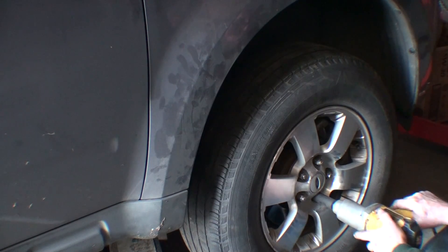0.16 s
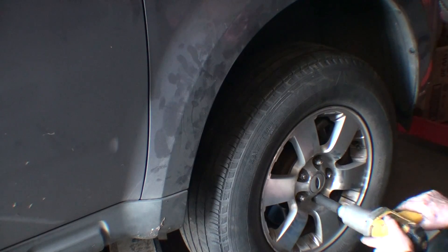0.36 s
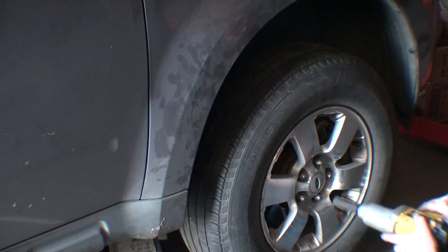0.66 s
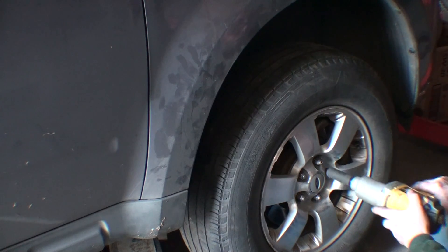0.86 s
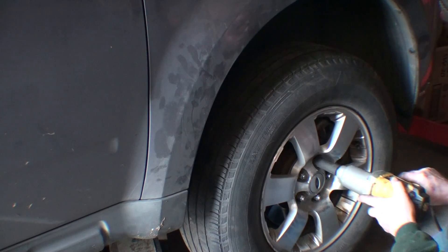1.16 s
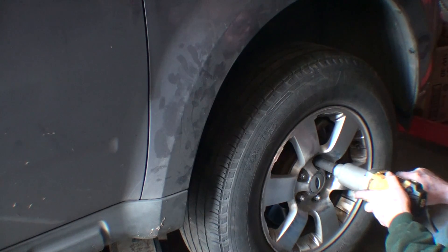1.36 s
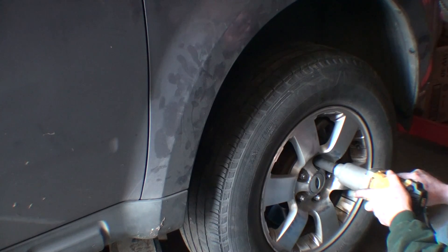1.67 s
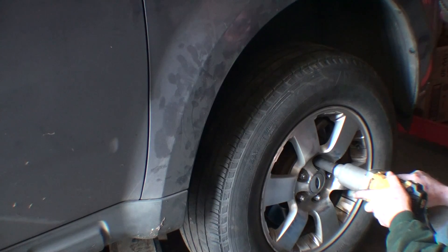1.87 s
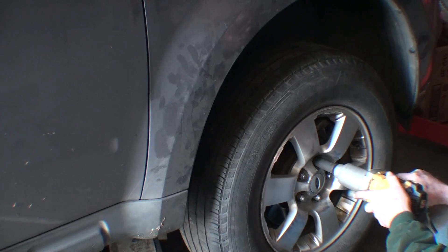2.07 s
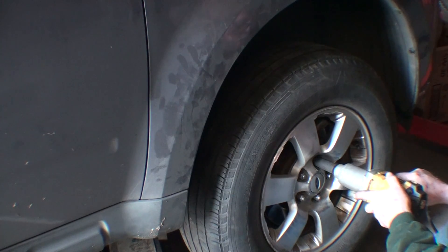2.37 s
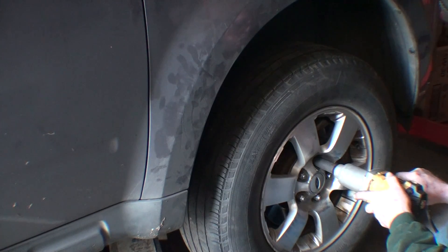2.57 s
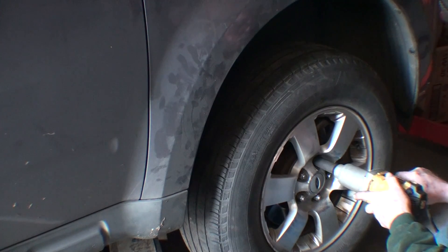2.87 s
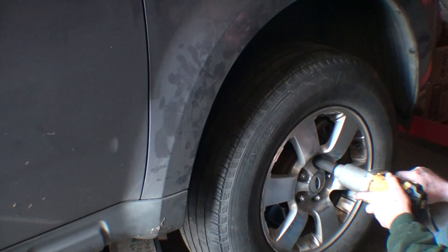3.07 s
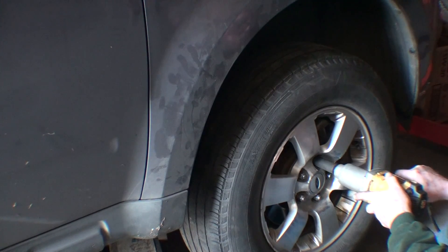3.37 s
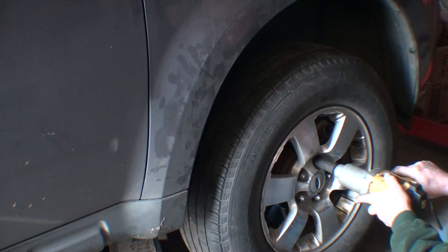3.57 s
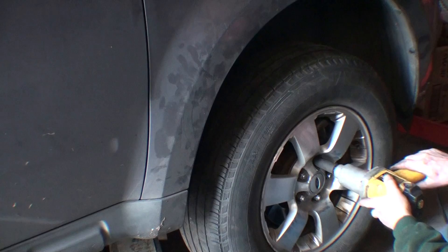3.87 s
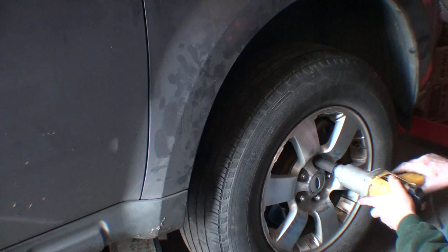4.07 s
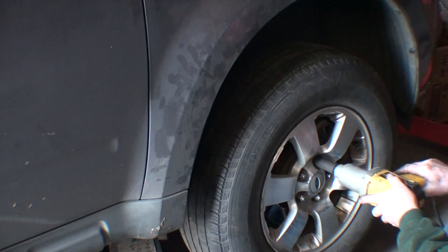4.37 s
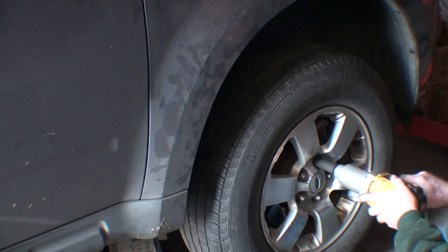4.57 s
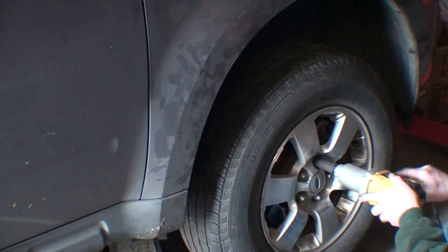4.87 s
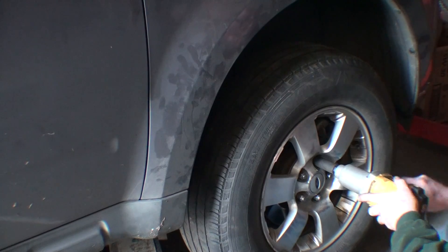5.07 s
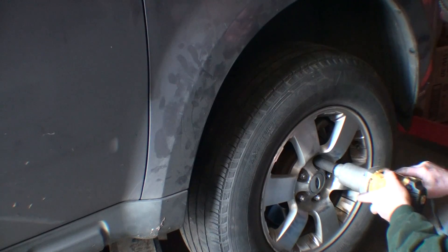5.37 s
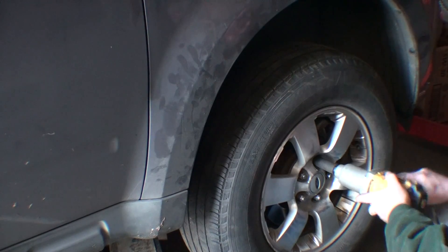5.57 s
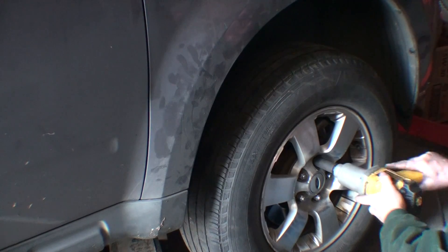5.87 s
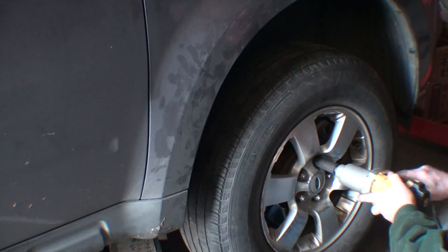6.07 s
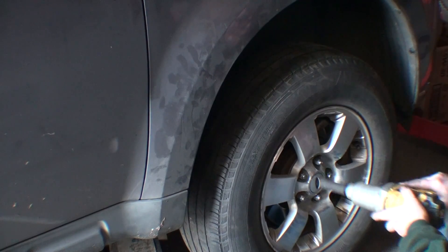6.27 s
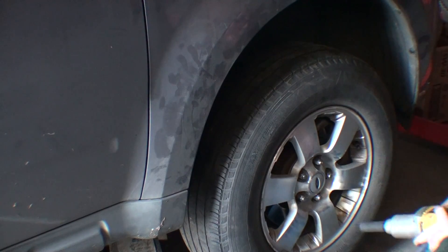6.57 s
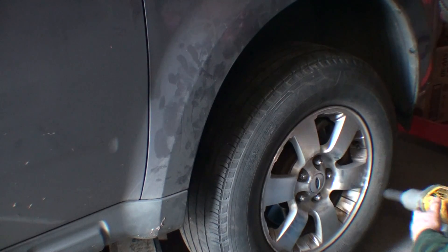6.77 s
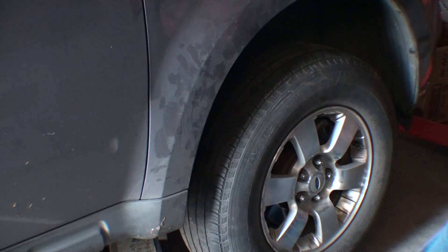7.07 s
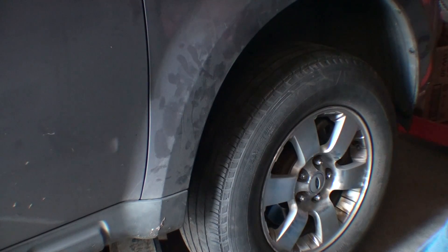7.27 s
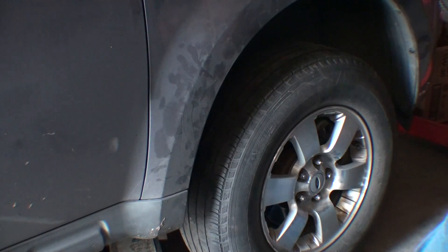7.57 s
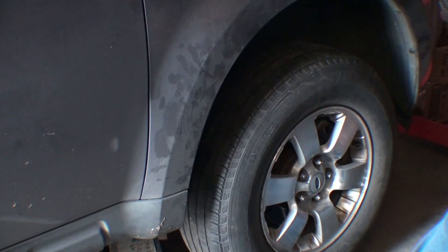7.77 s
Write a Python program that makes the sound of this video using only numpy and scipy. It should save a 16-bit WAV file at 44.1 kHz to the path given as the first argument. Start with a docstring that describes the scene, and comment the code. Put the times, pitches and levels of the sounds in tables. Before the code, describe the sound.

In a garage, an electric impact wrench rattles down to a stop, leaving a faint ringing rim and a few socket clicks. It then hammers a wheel nut loudly for about two seconds, around 37 blows a second, and coasts out irregularly. Soft knocks and scuffs follow as the socket fumbles; finally the tool lands on concrete with sharp clanks. Close microphone, short room reverberation.

```python
"""An electric impact wrench works on a wheel nut in a garage: filtered noise for rattle, bursts for blows.
It first coasts to a stop; the alloy rim rings on as beating sines, and the tool is moved to the next nut
with a few knocks of clicks and modes. It then hammers for two seconds, wheel and car body answering with
modes at the blow rate, and coasts again. The rim rings anew while the socket is fumbled on the nut;
at last the tool is put down on concrete with thuds and clanks. Reverberation and quiet air run throughout."""
import sys
import numpy as np
from scipy import signal
from scipy.fft import rfft, irfft, next_fast_len
from scipy.io import wavfile
from scipy.ndimage import uniform_filter1d

SR = 44100
rng = np.random.default_rng(int(sys.argv[2]) if len(sys.argv) > 2 else 0)


def wav_record(signal):
    """Record a signal, one row per channel, as 16-bit PCM in the file named by sys.argv[1]."""
    frames = np.transpose(np.atleast_2d(signal))
    bounded = np.clip(frames, -1, 1)
    # unit amplitude maps onto the largest positive 16-bit level
    quanta = np.round(bounded * 32767).astype(np.int16)
    wavfile.write(sys.argv[1], SR, quanta)


N = 349699
TIME = np.arange(N) / SR  # [s]

# Spectra and mode levels are relative: each sound is normalised before its own level is applied.

# Quiet air of the garage: (frequency [Hz], density [dB per Hz])
AIR = [(15, -40), (25, -20), (105, 1), (312, -14), (482, -9), (568, -9.5), (766, -13), (831, -8.5),
       (926, -13.5), (1060, -8), (4000, -28.5), (9000, -31), (16500, -34)]
AIR_DB = -74

# Trigger: (full level reached [s], let go [s], level against the hammering [dB], car body rumble [dB])
RUNS = [(-1, 0.0078, 1, -34), (1.635, 3.674, 1, -36)]
# Progress of the steady hammering: (time [s], blows struck so far [count])
BLOW_COUNT = [(1.6783, 0), (1.7086, 1), (1.7929, 4), (2.2898, 23), (2.5265, 32), (3.0108, 50), (3.5049, 68)]
# Steady hammering: (time [s], rattle level [dB], treble against rattle [dB], blow level [dB],
# spokes level [dB], barrel level [dB], car body level [dB])
STRIKES = [(1.67, -26, -14, -10, -50.5, -36, -47), (1.85, -28.5, -5, -10, -50, -39.5, -50),
           (1.93, -33, 0, -12.5, -35.5, -45.5, -47.5), (2.45, -28.5, -2, -12.5, -36, -51, -48.5),
           (2.65, -26.5, -4.5, -11.5, -42, -41.5, -44), (2.95, -27, -2, -12, -38.5, -41.5, -47),
           (3.1, -26, -8.5, -12.5, -39, -42, -52), (3.53, -27, -2, -12, -39.5, -40.5, -57.5)]
SPIN_UP_DB_PER_S, COAST_DB_PER_S = 334, 92.5
DULLER_DB_PER_S = 18  # further loss of treble while coasting
# The rattle dips briefly, or swells where negative: (time [s], depth [dB])
DIPS = [(2.55, 7.5), (2.785, 7), (3.075, 6.5), (3.155, -6), (3.215, 3), (3.275, -2.5), (3.345, -2.5),
        (3.405, 12.5)]
DIP_S = 0.013  # half-width of a dip, at 1/e of its depth
# Single blows while the hammer speeds up or coasts: (time [s], level [dB])
SINGLE_BLOWS = [(0.004, -10), (0.0295, -16), (0.0382, -10.5), (0.052, -16), (0.07, -11), (0.083, -9),
                (0.1213, -14), (0.1362, -8.5), (0.152, -12.5), (0.2001, -18), (0.2051, -9), (0.2226, -12.5),
                (0.296, -17), (0.3161, -20.5), (0.333, -12.5), (0.4608, -22.5), (0.4777, -38),
                (0.4936, -32), (0.5094, -41.5), (0.547, -43.5), (1.528, -33), (1.5614, -23.5),
                (1.5826, -21.5), (1.6102, -7), (1.638, -12), (1.645, -7), (3.534, -6.5), (3.5403, -7.5),
                (3.552, -12), (3.5659, -11.5), (3.5728, -13), (3.6003, -10), (3.6175, -19), (3.6295, -9),
                (3.65, -12), (3.6614, -18.5), (3.6765, -21.5), (3.7017, -7.5), (3.7188, -16.5),
                (3.7329, -15), (3.752, -22), (3.786, -18), (3.7917, -12), (3.8119, -11.5), (3.906, -18),
                (3.928, -19), (3.9512, -16)]
FLARE_DB, FLARE_T60_S = -17, 0.11  # rattle flaring after a single blow, against the blow's level
WHEEL_FLARE = 1  # share of a flare that shakes the wheel
BODY_FOLLOWS = 0.61  # the car body swings less widely in dB
WHEEL_DB = -10.5  # roar of the wheel

# Rattle of socket and gears: (frequency [Hz], density [dB per Hz])
RATTLE = [(530, -30.5), (900, -5.5), (1120, 3), (1360, -0.5), (1780, 4.5), (2560, 0), (4370, -4.5),
          (8330, -2.5), (10900, -9), (12300, -12), (16500, -20)]
# Resonances of the steel socket: (frequency [Hz], width [Hz], level [dB])
SOCKET = [(1130, 55, 0), (1790, 50, 0), (2000, 70, -5), (2515, 80, 1), (2720, 80, -4), (3200, 150, -3),
          (4080, 75, -4), (5430, 70, -4), (8500, 120, -3), (12100, 250, -8)]
# Colour while the socket sits slack on the nut: (frequency [Hz], gain [dB])
SLACK = [(900, -2.5), (1400, -3.5), (2000, -1), (2700, 3.5), (3600, 2.5), (5000, 8), (7000, 1)]
# Seating of the socket: (time [s], share seated firmly [0 to 1])
SEATED = [(0.3, 0), (1.6, 0.55), (1.95, 0.94)]
# Roar of the wheel and rumble of the car body: (frequency [Hz], density [dB per Hz])
WHEEL_ROAR = [(200, -38.0), (350, -6.5), (500, -2.0), (800, -3.0), (1100, -19.0), (1500, -42.5)]
BODY_RUMBLE = [(25, -30.5), (60, -10.0), (110, 0.5), (250, -7.0), (350, -59)]
JOLT, JOLT_TURNS = 0.19, 0.1  # leap of the rattle at a blow, and its decay in blow intervals
RATTLE_ROOM_DB = -3  # the rattle is aimed at the microphone more than at the walls

# Crack of a steady blow: (frequency [Hz], density [dB per Hz])
CRACK = [(880, -36), (1500, -10.5), (1560, -4.5), (3180, -1), (3590, -1), (8330, 0.5), (10900, -6),
         (12300, -0.5), (16500, -28)]
# Modes of the anvil: (frequency [Hz], level [dB], t60 [s])
ANVIL = [(1130, -3, 0.03), (1290, -7, 0.03), (1460, -8, 0.03), (1790, -3, 0.025), (1970, -5, 0.02),
         (2340, -8, .02), (2515, 0, 0.022), (2730, -4, .02), (3200, 0, .018), (4085, -7, .02),
         (8500, -1, .025)]
SEAT_SPREAD = .006  # the socket seats anew at each blow: relative spread of the anvil modes
# Blows with a distinct ring: (time [s], level against the other blows [dB], strongest ring [Hz])
DISTINCT = [(1.709, 0, 1760), (1.766, 3.5, 2490), (1.871, 4.5, 3190), (1.925, 7.5, 2360), (2.029, 0, 2810),
            (2.08, 0, 3200), (2.16, 0, 3200), (2.343, -2, 1750), (2.82, 5, 1310), (2.956, 3, 2580),
            (3.01, 3, 2450), (3.04, 5.5, 2500), (3.12, 4, 2550), (3.149, 2.5, 2510), (3.175, -1.5, 2500),
            (3.28, -4, 1150), (3.34, 5, 2520), (3.422, 2.5, 2580), (3.477, 4.5, 3180)]
# Slow blows of a single strike: (frequency [Hz], density [dB per Hz])
SLOW_BLOW = [(530, -22), (900, -8.5), (1520, -4), (1800, -2), (2700, -2.5), (3920, -4.5), (4600, -8.5),
             (7030, -9), (12000, -13.5), (16500, -43.5)]
DRUM_DB = -26  # wheel modes of a single blow against its level

# Garage reverberation: (frequency [Hz], t60 [s])
GARAGE = [(100, 0.94), (300, 0.62), (1000, .55), (3000, 0.61), (8000, 0.55), (11000, 0.33), (13300, 0.33),
          (15000, 0.078)]

# Long ring of the rim until hand or socket stills it: (start [s], level [dB], stilled [s])
RINGING = [(0.33, -58.5, 1.15), (3.85, -52, 6.6)]
# Slow modes of the rim: (frequency [Hz], level [dB])
RIM = [(840, 0), (692, -14), (697, -16), (1222, -26)]
RIM_T60_S = 2.6

# Hands with the tool at rest, one list a spell: (time [s], scuffing level [dB], low rumble level [dB])
HANDS = [
    [(0.5, -87, -78.5), (1.05, -92.5, -97), (1.2, -75.5, -75), (1.52, -91, -69.5)],
    [(3.9, -94, -63), (4.3, -80, -76), (4.55, -87.5, -74.5), (4.85, -78.5, -66.5), (5.4, -86, -70),
     (6.05, -76, -65), (6.3, -81.5, -74), (6.6, -78, -82.5), (6.9, -75.5, -88.5), (7.3, -70.5, -93),
     (7.6, -53, -90), (7.78, -72, -96), (7.93, -73, -81)],
]
# Scuffing of hands and sleeves: (frequency [Hz], density [dB per Hz])
CLOTH = [(88, -32), (150, 0), (240, -13.5), (448, -7), (821, -5), (2220, -8), (6910, -15), (16000, -28)]
# Low rumble of handling: (frequency [Hz], density [dB per Hz])
HAND_RUMBLE = [(15, -22.5), (30, 11.5), (70, -1), (120, 4), (180, -39.5)]

# Socket and tool handled on the wheel:
# (time [s], click level [dB], knock level [dB], brightness [dB], knock pitch [Hz])
KNOCKS = [(1.147, -47, -47.5, -7, 505), (1.16, -46.5, -54.5, -14, 538), (1.1726, -42.5, -52, -1.5, 985),
          (1.2092, -49, -51, -7, 735), (1.2245, -51, -68, 10, 616), (1.3004, -57, -56, -22, 842),
          (1.3293, -43.5, -38.5, -9, 434), (4.5186, -60.5, -68, 1.5, 850), (4.5765, -58, -58, 7, 851),
          (4.587, -49, -46, -9, 530), (4.616, -65, -53, -19, 500), (4.698, -40, -47.5, -11, 376),
          (4.7451, -40.5, -49, -3, 480), (4.7528, -34.5, -36, -2, 470), (4.8888, -52, -61, 3.5, 307),
          (5.114, -55.5, -69, -8, 1106), (5.1233, -50.5, -55.5, -14, 994), (5.137, -61, -53.5, -16.5, 450),
          (5.152, -63, -78, -17, 1100), (5.168, -67.5, -77, -20, 460), (5.3294, -50.5, -63, -10, 390),
          (5.361, -46.5, -58, -7, 270), (5.3743, -57, -48, -14.5, 457), (5.4203, -54, -77, -9, 453),
          (5.5006, -52.5, -44.5, -0.5, 460), (5.5394, -43.5, -53, -8.5, 450), (5.6564, -57, -57, -15, 596),
          (5.677, -57, -57, -19, 500), (5.7269, -50.5, -74, -7, 393), (5.762, -71, -56.5, -20, 500),
          (5.8212, -50, -55, -20, 468), (5.8389, -47, -54, -14, 447), (5.858, -56, -66, -7, 1100),
          (5.878, -52, -70, -12, 444), (5.9016, -43.5, -56, -11, 457), (5.925, -60, -57, -12, 460),
          (5.9618, -55.5, -74, -1, 367), (5.9824, -66.5, -54.5, -16, 517), (6.0487, -44.5, -75, 0.5, 789),
          (6.09, -63, -59.5, -16, 460), (6.1567, -56.5, -65, -21, 335), (6.2367, -55, -55, -8, 1160),
          (6.248, -58, -71, -11, 1000), (6.2692, -47, -45.5, 0.5, 870), (6.288, -63, -58, -14, 1130),
          (6.312, -63.5, -60, -18, 1500), (6.4238, -67.5, -67, 12, 870), (6.561, -63, -66.5, -15.5, 768),
          (6.755, -56, -61, 0, 950), (6.8147, -58, -58, 6.5, 460), (6.878, -58, -79.5, 0, 222.5),
          (7.8096, -53.5, -55.5, -26.5, 1040)]
# Modes of the knocked hub: (frequency [Hz], level [dB], t60 [s])
HUB = [(169, 9, 0.21), (300, -2.5, 0.18), (455, 1, 0.08), (480, 1.5, 0.082), (665, -15, 0.081),
       (744, 7, 0.054), (895, -3, 0.014), (1110, 6, 0.038), (1540, 5.5, 0.021)]
# Body of a click, its bright edge and its dull weight: (frequency [Hz], density [dB per Hz])
STEEL = [(100, -47), (500, -24), (1000, 0.5), (1300, 3), (2600, -3), (3700, -8), (5000, -22), (15000, -48)]
TICK = [(2500, -40), (4500, -1.5), (9000, -3.5), (12000, -14), (16000, -39)]
THUD = [(40, -65), (70, -23.5), (120, 3.5), (300, -5), (700, -2), (1100, -11.5), (1800, -35)]

# Modes of the spokes, of the barrel, and of tyre and car body: (frequency [Hz], level [dB], t60 [s])
SPOKES = [(610.7, 0, 0.09), (690.5, 3, 0.073), (725.7, 7, 0.056), (775, -2.5, 0.06), (801.6, -5, 0.14),
          (1436, 4, 0.04)]
BARREL = [(296, -6, 0.097), (444, -2, 0.12), (515, -2, 0.21)]
SHAKE = [(77.3, -7.5, 0.28), (115, 21.5, 0.052), (148, -4, 0.2), (177.2, -1.5, 0.52), (238, -12.5, 0.096),
         (285, -8.5, 0.082)]
# Many close modes of the bodywork: (frequency [Hz], density [dB per Hz])
PANELS = [(120, -30), (200, -5.5), (400, 1.5), (900, -1.5), (1200, -33)]

# Tool put down on concrete: (time [s], click level [dB], thud level [dB], brightness [dB],
# thud pitch [Hz], clank level [dB], clank pitch [Hz])
DROPS = [(6.9277, -40, -46, 1, 823, -43, 2340), (7.153, -38, -43, -22.5, 780, -52.5, 1300),
         (7.159, -20.5, -35.5, -5, 795, -21.5, 2600), (7.356, -51, -27.5, -19, 300, -25.5, 1200),
         (7.3588, -17, -20.5, -7.5, 300, -22, 1200)]
# Modes of the tool's case, then of its steel nose: (frequency [Hz], level [dB], t60 [s])
CASE = [(122, -16, 0.082), (216, 9, 0.052), (300, 3, 0.024), (407, -6.5, 0.045), (823, -1, 0.023)]
CLANK = [(954, -5.5, 0.055), (1200, -2, 0.037), (1840, -4.5, 0.022), (2400, -5, 0.021), (2650, 4, 0.019),
         (3560, -6, 0.012)]

BOTTOM_HZ, TOP_HZ = 22, 16620  # the microphone falls away below; nothing is kept above


def amp(db):
    """Decibel law: the amplitude gain of a level in dB."""
    return 10 ** (np.asarray(db) / 20)


def unit(x):
    """Normalisation: x at rms 1."""
    return x / np.sqrt(np.mean(x ** 2) + 1e-20)


def along(points, hz):
    """Logarithmic pitch scale: (frequency [Hz], value) points interpolated along log frequency."""
    f, values = np.transpose(points)
    return np.interp(np.log(hz + 1), np.log(f + 1), values)


def levels(tables, column):
    """Envelope: gain per sample from a dB column of several tables, silent between them."""
    out = np.zeros(N)
    for rows in map(np.array, tables):
        out += amp(np.interp(TIME, rows[:, 0], rows[:, column], left=-200, right=-200))
    return out


def fading(s, db, t60):
    """Exponential decay: gain per sample that starts at s seconds and falls 60 dB in t60 seconds."""
    return amp(db - 60 * np.abs(TIME - s) / t60) * (TIME >= s)


def filtered(x, response):
    """Linear filtering: the spectrum of x times a complex response of frequency."""
    size = next_fast_len(x.shape[-1] + 8192)
    spectrum = rfft(x, size) * response(np.fft.rfftfreq(size, 1 / SR))
    return irfft(spectrum, size)[..., :x.shape[-1]]


def resonances(peaks):
    """Superposition of damped oscillators: causal response of (Hz, width, dB) peaks of alternating sign."""
    def response(f):
        return sum((-1) ** k * amp(db) * 1j * f * width / (centre ** 2 - f ** 2 + 1j * f * width)
                   for k, (centre, width, db) in enumerate(peaks))
    return response


def noise(spectrum, patchy_db, size=N):
    """Random excitation: coloured noise of rms 1 whose gain varies in patches of time and frequency."""
    z = signal.stft(rng.standard_normal(size + 256), nperseg=256)[2]
    patches = uniform_filter1d(rng.standard_normal(z.shape), 6, 0)
    patches = uniform_filter1d(patches, 8, 1)
    x = signal.istft(z * amp(patchy_db * unit(patches)), nperseg=256)[1][:size]
    return unit(filtered(x, lambda hz: amp(along(spectrum, hz))))


def burst(spectrum, shape):
    """Direct and diffuse radiation: a noise burst of peak 1, and its energy evenly coloured for the room."""
    near = shape * noise(spectrum, patchy_db=2.5, size=len(shape))
    near = near / np.abs(near).max()
    impulse = 1. * (np.arange(len(shape)) == 100)
    spread = filtered(impulse, lambda hz: amp(along(spectrum, hz)))
    return np.array([near, spread * np.linalg.norm(near) / np.linalg.norm(spread)])


def ring(modes, scatter_db, centre_hz=600, focus_db=0, attack_s=0.00083):
    """Modal synthesis: modes dying after one blow, peak 1; they lose focus_db an octave off centre_hz."""
    t = TIME[:SR // 5]
    x = 0
    for hz, db, t60 in modes:
        mode_db = db + scatter_db * rng.standard_normal() - focus_db * abs(np.log2(hz / centre_hz))
        x = x + amp(mode_db - 60 * t / t60) * np.sin(2 * np.pi * hz * t)
    x = x * (1 - np.exp(-t / attack_s))
    return x / np.abs(x).max()


def add(track, s, sound):
    """Superposition: mixes a sound into a track, in place, at s seconds."""
    part = track[..., round(s * SR):][..., :sound.shape[-1]]
    part += sound[..., :part.shape[-1]]


def beats():
    """Periodic excitation: times of the steady blows, read from their running count."""
    s, count = np.transpose(BLOW_COUNT)
    return np.interp(np.arange(count[-1] + 1), count, s)


def air():
    """Stationary background noise: the quiet air of the garage."""
    return amp(AIR_DB) * noise(AIR, patchy_db=-1.5)


def running():
    """Exponential build-up and decay: gains of rattle, treble and wheel shaking, flaring at single blows."""
    s, work_db, treble_db = np.transpose(STRIKES)[:3]
    low, high = 0, 0
    for pulled, released, db, _ in RUNS:
        t = TIME - released + RUNS[-1][1]  # every run ends as the last one does
        off = np.maximum(TIME - released, 0)
        dip_db = sum(depth * np.exp(-((t - at) / DIP_S) ** 2) for at, depth in DIPS)
        spin_up_db = SPIN_UP_DB_PER_S * np.maximum(pulled - TIME, 0)
        gain = amp(np.interp(t, s, work_db) - dip_db + db - spin_up_db - COAST_DB_PER_S * off)
        low = low + gain
        high = high + gain * amp(np.interp(t, s, treble_db) - DULLER_DB_PER_S * off)
    flare = sum(fading(at, db + FLARE_DB, FLARE_T60_S) for at, db in SINGLE_BLOWS)
    return np.hypot(low, flare), np.hypot(high, amp(-6.5) * flare), np.hypot(low, WHEEL_FLARE * flare)


def rattle():
    """Amplitude modulation: socket and gears chatter between the blows and shake wheel and car."""
    turn = np.interp(TIME, *np.transpose(BLOW_COUNT), left=.5, right=.5)
    phase = turn % 1
    # the hammer flies free just before each blow, and the rattle weakens
    free = 1 - 0.7 * np.exp(-((phase - .96) / 0.045) ** 2)
    each = amp(0.95 * rng.standard_normal(len(beats()) + 1))[turn.astype(int)]
    # the spring shudders three times between blows
    shudder = 1 + JOLT * np.exp(-phase / JOLT_TURNS) + 0.25 * np.cos(2 * np.pi * (3 * turn - .1))

    # random ticks, about 900 a second, over noise excite the socket
    ticks = (rng.random(N) < 900 / SR) * amp(2.5 * rng.exponential(size=N)) * rng.choice([-1, 1], N)
    chatter = unit(filtered(ticks + 3.8 * rng.standard_normal(N), resonances(SOCKET)))
    steel = unit(noise(RATTLE, patchy_db=1.5) + .5 * chatter)
    seated = np.interp(TIME, *np.transpose(SEATED)).clip(0, 1)
    slack = filtered(steel, lambda hz: amp(along(SLACK, hz)))
    steel = seated * steel + (1 - seated) * slack
    treble = filtered(steel, lambda hz: 1 / (1 + (6500 / (hz + 1)) ** 8))

    low, high, shaken = running()
    out = amp(-4.0) * free * each * shudder * (low * unit(steel - treble) + high * unit(treble))
    # while the blows are steady the drumming takes over from the loose shaking
    loose = np.where((TIME > RUNS[-1][0]) & (TIME < RUNS[-1][1]), .55, 1)
    wheel = amp(WHEEL_DB) * shaken * free * noise(WHEEL_ROAR, patchy_db=2.0)
    body_db = np.where(TIME < 1, RUNS[0][3], RUNS[1][3])
    body = amp(body_db) * shaken ** BODY_FOLLOWS * noise(BODY_RUMBLE, patchy_db=2.5)
    return out + loose * (wheel + body)


def blows():
    """Impact excitation: hammer on anvil, two lugs just apart; a coasting hammer lands more softly."""
    out, t = np.zeros((2, N)), TIME[:SR // 20]
    second_lug = 0.8 * amp(-60 * (t - .0017) / 0.006) * (t > .0017)
    sharp = amp(-60 * t / 0.0033) + 0.2 * amp(-60 * t / 0.16) + second_lug
    soft = (amp(-60 * t / 0.018) + 0.16 * amp(-60 * t / 0.04)) * (1 - np.exp(-t / 0.0013))
    blow_s, blow_db = np.array(STRIKES)[:, [0, 3]].T
    for s in beats():
        _, extra_db, hz = next((row for row in DISTINCT if abs(row[0] - s) < .009), (s, 0, 0))
        db = np.interp(s, blow_s, blow_db) - 1.2 + extra_db + rng.normal(0, 0.57)
        seated = [(f * (1 + SEAT_SPREAD * rng.standard_normal()), level, t60) for f, level, t60 in ANVIL]
        anvil = ring(seated, scatter_db=4, centre_hz=hz or 2000, focus_db=12 * (hz > 0))
        add(out, s - .0002, amp(db - extra_db / 2) * burst(CRACK, sharp))
        add(out, s, amp(db - 10) * anvil)
    for s, db in SINGLE_BLOWS:
        add(out, s - .001, amp(db - 5.5) * burst(SLOW_BLOW, soft))
        wheel_db = db + DRUM_DB + 2.5 * rng.standard_normal()
        add(out, s, amp(wheel_db) * ring(SPOKES + BARREL, scatter_db=2))
    return out


def garage(x):
    """Reverberation: fast over weak slow decay; a fresh random tail is drawn every third of a second."""
    out, step = np.zeros(N + 2 * SR), SR // 3
    for start in range(0, N, step):
        hz, t, z = signal.stft(rng.standard_normal(SR), SR, nperseg=256)
        fast = amp(-60 * t / along(GARAGE, hz)[:, None])
        slow = amp(-24 - 60 * t / 0.43)
        tail = signal.istft(z * (fast + slow), SR, nperseg=256)[1]
        echo = signal.fftconvolve(x[start:start + step], tail / np.linalg.norm(tail))
        add(out, start / SR + .004, echo)
    return out[:N]


def rim():
    """Beating: the rim's slow modes decay freely, and a close pair of them interferes."""
    level = sum(fading(s, db, RIM_T60_S) * (TIME < end) for s, db, end in RINGING)
    smooth = uniform_filter1d(level, size=SR // 50)
    return np.sqrt(2) * smooth * sum(amp(db) * np.sin(2 * np.pi * hz * TIME) for hz, db in RIM)


def scuffing():
    """Friction noise: hands and sleeves scuff over a low rumble."""
    scuff = levels(HANDS, 1) * noise(CLOTH, patchy_db=4.0)
    return scuff + levels(HANDS, 2) * noise(HAND_RUMBLE, patchy_db=-1.5)


def contacts(rows, modes, t60, grit, tilt, plain_db):
    """Impact of solids: a click, its bright edge, a dull thud and the low modes of the thing struck."""
    out, t = np.zeros((2, N)), TIME[:SR // 10]
    shape = (amp(-60 * t / t60) + .8 * amp(-60 * t / .014)) * (1 - np.exp(-t / 0.0007))
    edge = amp(-60 * t / 0.01) * (1 - np.exp(-t / 0.00036)) + grit * shape
    slow = amp(-60 * t / 0.27) * (1 - np.exp(-t / 0.00035))
    for s, db, low_db, bright_db, hz, *_ in rows:
        hard_db = tilt * (db - low_db - plain_db)  # the more click over knock, the harder
        # a harder contact clicks higher
        steel = [(f, level + hard_db * np.log2(min(f, 6000) / 2000)) for f, level in STEEL]
        click = burst(steel, shape) + amp(bright_db - 1.5) * burst(TICK, edge)
        knock = ring(modes, scatter_db=2.5, centre_hz=hz, focus_db=12)
        add(out, s - .001, amp(db) * click)
        add(out, s - .001, amp([[low_db + 1], [low_db - 3]]) * knock)  # towards microphone, into room
        add(out, s - .001, amp(low_db - 4.5) * burst(THUD, slow))
    return filtered(out, lambda hz: (1j * hz / (1j * hz + 90)) ** 2)  # knocks and drops carry no deep bass


def knocks():
    """Impact on a resonant body: socket and tool knock on the wheel and excite the hub."""
    return contacts(KNOCKS, HUB, t60=0.049, grit=0.59, tilt=0.22, plain_db=-1)


def drumming():
    """Harmonics of a periodic force: wheel and car answer blows alike and hum at multiples of their rate."""
    out = 0
    answers = [(SPOKES, 0), (BARREL, .002), (SHAKE, .012)]  # modes, delay [s]
    for column, (modes, late) in enumerate(answers, start=4):
        track = np.zeros(N)
        for s in beats():
            add(track, s + late, amp(rng.normal(0, 1)) * ring(modes, scatter_db=1, attack_s=.005))
        out = out + amp(-3.0) * levels([STRIKES], column) * track / np.std(track[track != 0])
    t, track = TIME[:SR // 10], np.zeros(N)
    # one and the same noise burst answers each blow
    panels = noise(PANELS, patchy_db=1.5, size=len(t)) * amp(-60 * t / 0.4) * (1 - np.exp(-t / 0.0017))
    for s in beats():
        add(track, s, panels)
    # the panels follow the level of the barrel
    return out + amp(-5) * levels([STRIKES], 5) * track / np.std(track[track != 0])


def drops():
    """Impact on a rigid floor: the tool is put down and its case thuds."""
    return contacts(DROPS, CASE, t60=0.045, grit=0.75, tilt=0.64, plain_db=1.5)


def clanks():
    """Damped free vibration: the tool's steel nose rings on the floor, mostly towards the microphone."""
    out = np.zeros((2, N))
    for s, *_, db, hz in DROPS:
        clank = ring(CLANK, scatter_db=1.5, centre_hz=hz, focus_db=10)
        add(out, s - .001, amp([[db], [db - 5]]) * clank)
    return out


def scene():
    """Superposition of direct and reverberant sound: tool and hands in the garage, over the quiet air."""
    tool = blows() + amp([[0], [RATTLE_ROOM_DB]]) * rattle()
    near, spread = tool + scuffing() + knocks() + drops() + clanks()
    return (near + amp(-5.0) * garage(spread) + drumming() + rim() + air())[None]


def record(dry):
    """Band limitation: the microphone loses the deepest bass, and nothing passes above the upper limit."""
    return filtered(dry, lambda hz: (hz < TOP_HZ) * (1j * hz / (1j * hz + BOTTOM_HZ)) ** 2)


dry = scene()
out = record(dry)
wav_record(out)
```